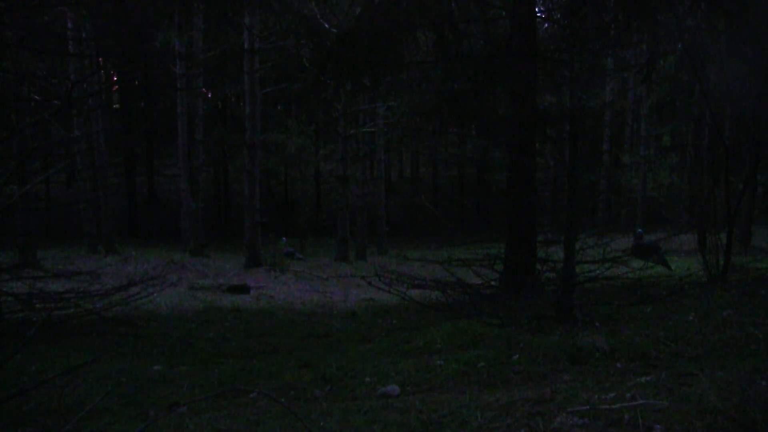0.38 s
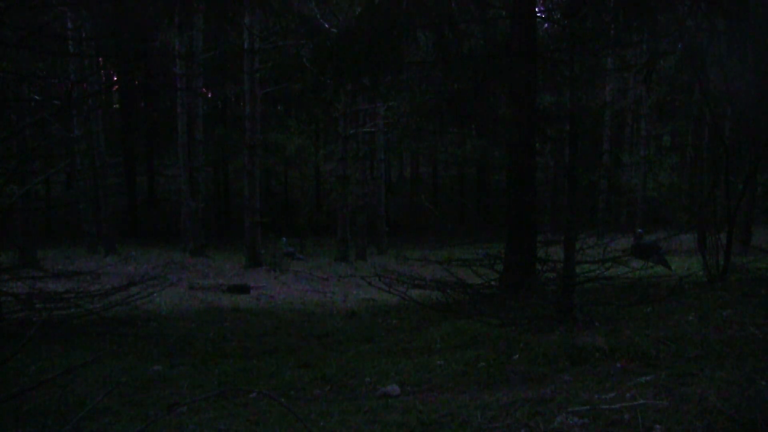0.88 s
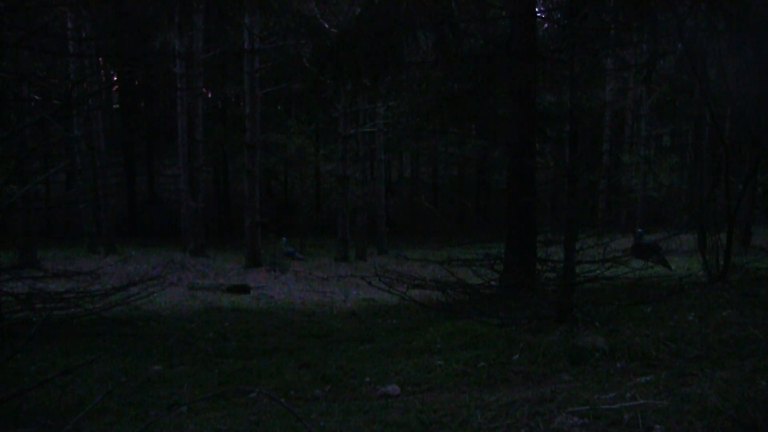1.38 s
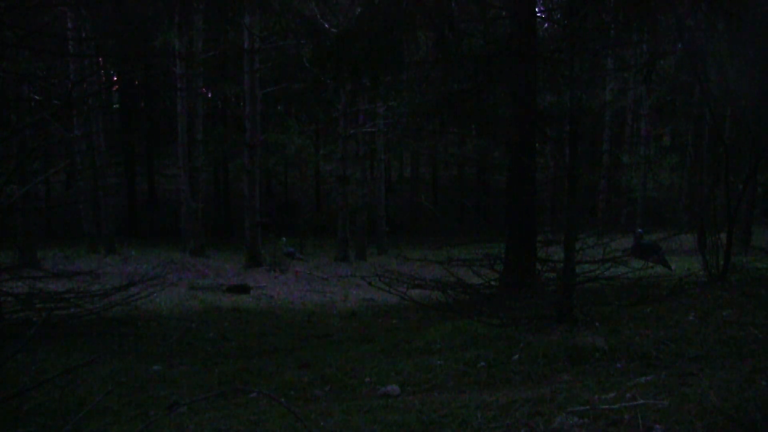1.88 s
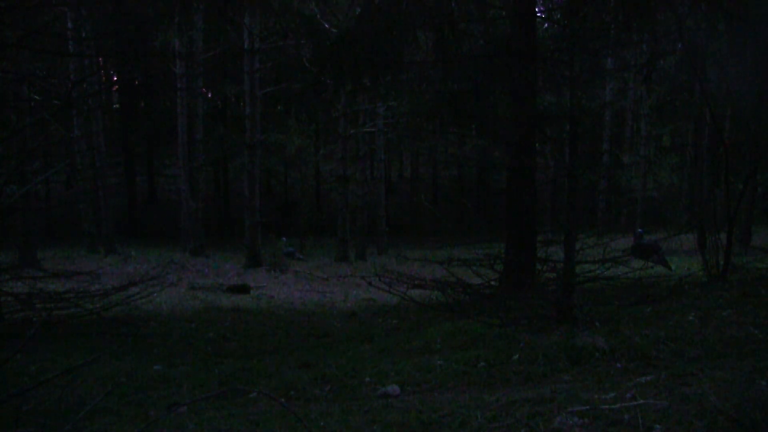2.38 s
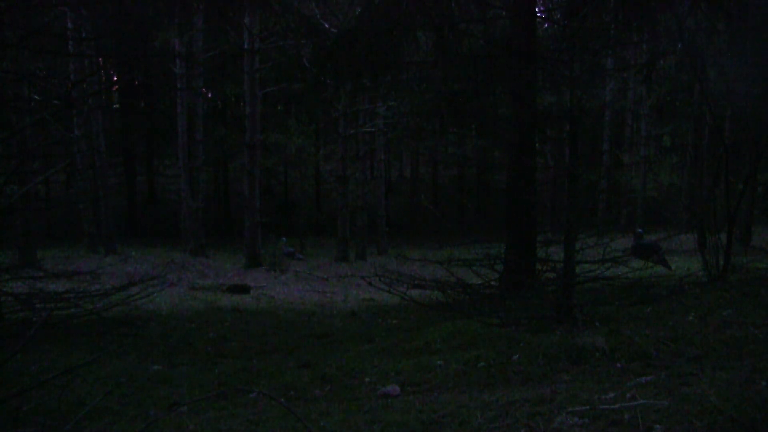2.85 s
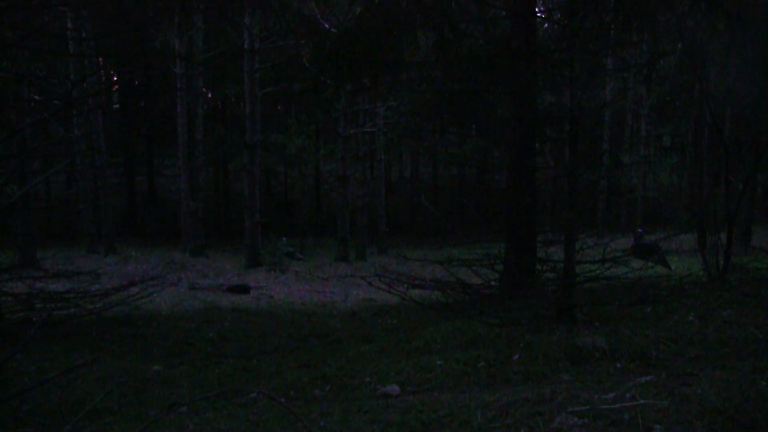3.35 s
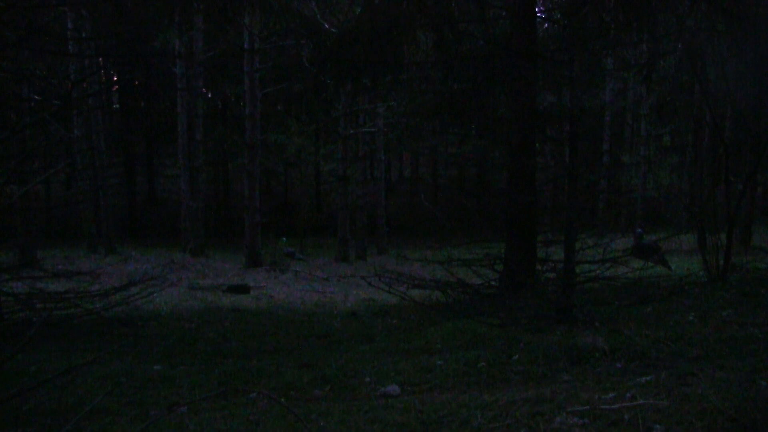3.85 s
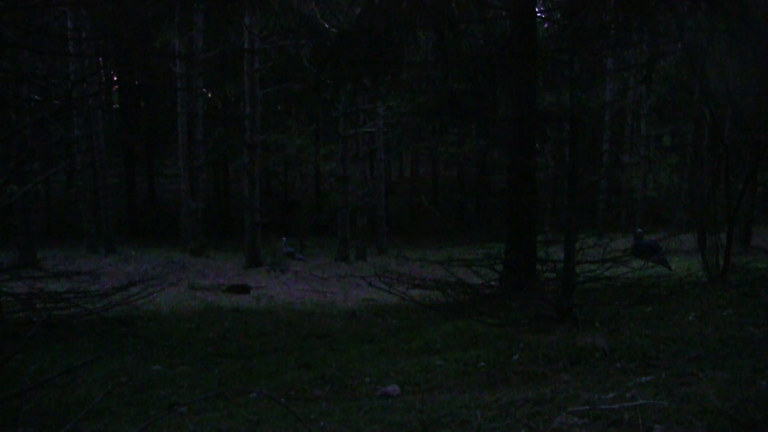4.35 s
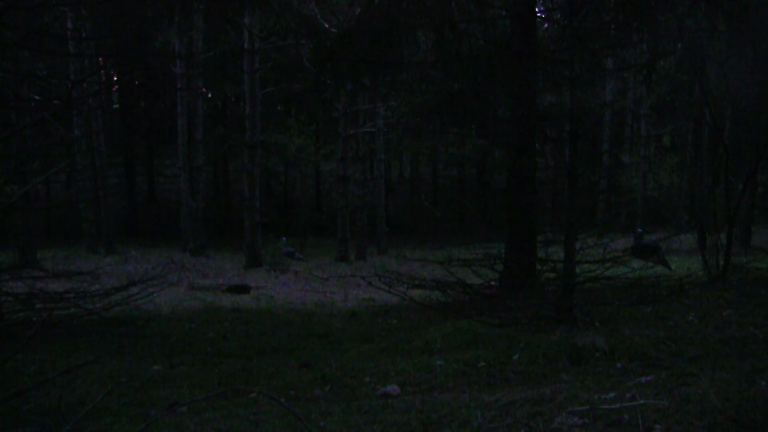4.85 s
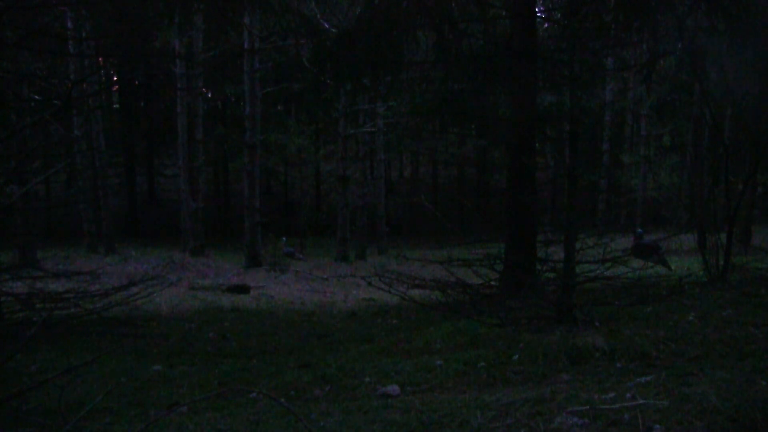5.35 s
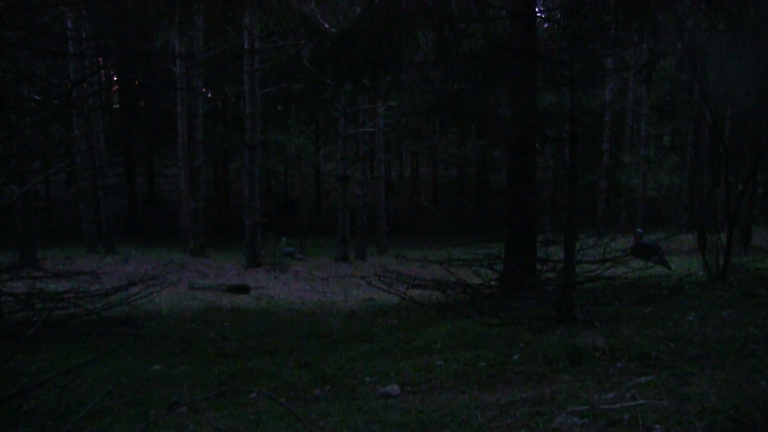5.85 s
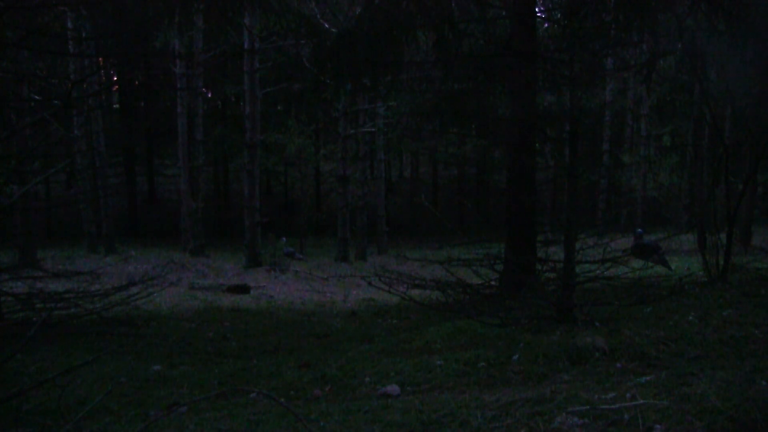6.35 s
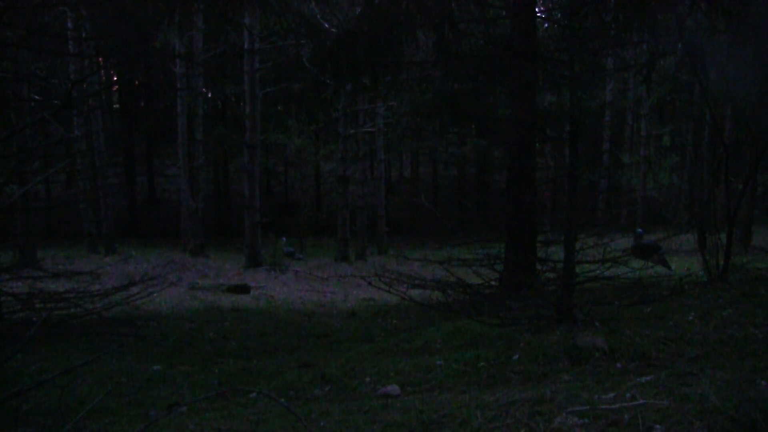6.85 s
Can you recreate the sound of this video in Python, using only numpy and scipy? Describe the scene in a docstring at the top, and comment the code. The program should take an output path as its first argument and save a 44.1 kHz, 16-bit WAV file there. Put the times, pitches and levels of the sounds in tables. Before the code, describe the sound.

Stereo forest ambience with soft hiss and low rumble. A near hen turkey on the left clucks, waits, then yelps six evenly spaced times, very short and loud, with faint tails from the trunks. High sine-like songbird notes climb behind her. After she stops the air swells suddenly; a crow-like bird caws three times, a far tom gobbles in broken bursts, a twig ticks and leaves briefly rustle.

```python
"""A turkey hen clucks and yelps close by on the left, in woods at dawn, while a small songbird whistles up a scale.
From 5.1 s the background is louder: three crow-like caws, a distant tom's gobble, a twig tick, a leaf rustle.
Hen, caw and tom are overtones of moving pitches, each weighted by a spectral curve, plus noise for breath.
Songbirds are gliding sines; background and rustle are shaped noise, the background with a low sine.
The trunks return every call as a soft decaying noise tail.
"""
import sys
import numpy as np
from scipy import signal
from scipy.fft import rfft, irfft, next_fast_len
from scipy.io import wavfile
from scipy.ndimage import uniform_filter1d, map_coordinates

SR = 44100
rng = np.random.default_rng(int(sys.argv[2]) if len(sys.argv) > 2 else 0)


def convert_level_to_amplitude(level_db):
    """Map a level in decibels to its linear amplitude factor."""
    exponent = np.asarray(level_db, float) / 20
    return 10 ** exponent


def transcribe(signal):
    """Save signal, clipped to [-1, 1], as a 16-bit WAV file at the path in sys.argv[1]."""
    frames = np.atleast_2d(signal).T
    limited = np.clip(frames, -1, 1)
    pcm = np.round(limited * 32767).astype(np.int16)
    wavfile.write(sys.argv[1], SR, pcm)


N = 318843


def unit(x):
    """Scale to rms 1."""
    return x / np.sqrt(np.mean(x ** 2) + 1e-20)


def along(points, hz):
    """Read (frequency [Hz], value) points on a log frequency axis."""
    f, v = np.transpose(points)
    return np.interp(np.log(hz + 1), np.log(f + 1), v)


def played(rows):
    """Sample indices a time table spans, and one smoothed curve per further column."""
    time_s, *columns = np.transpose(rows)
    i = np.arange(int(time_s[0] * SR), min(N, int(time_s[-1] * SR)))
    return i, [uniform_filter1d(np.interp(i / SR, time_s, c), size=90) for c in columns]


def span(start_s, length_s):
    """Sample indices of one event, cut at the end of the scene."""
    return np.arange(int(start_s * SR), min(N, int((start_s + length_s) * SR)))


def wobble(knots_per_s, count=N):
    """Smooth random curve through normal-distributed knots."""
    knots = rng.standard_normal(int(count * knots_per_s / SR) + 4)
    return map_coordinates(knots, [np.arange(count) * knots_per_s / SR])


def cycles(pitch_hz):
    """Phase [rad] of a moving pitch."""
    return 2 * np.pi * np.cumsum(pitch_hz) / SR


def filtered(x, response):
    """Multiply the spectrum of x by a response of frequency [Hz]."""
    m = next_fast_len(N + 8192)
    return irfft(rfft(x, m) * response(np.fft.rfftfreq(m, 1 / SR)), m)[..., :N]


def breath_noise(spectrum):
    """Noise of rms 1, shaped by (frequency [Hz], level [dB])."""
    return unit(filtered(rng.standard_normal(N), lambda hz: convert_level_to_amplitude(along(spectrum, hz))))


def voice(pitch_hz, spectrum, count, flicker_db, bright_db_per_octave=0):
    """Overtones of a moving pitch, each as loud as the spectrum lets it be; those above the second flicker."""
    k = np.arange(1, count + 1)[:, None]
    phase = cycles(pitch_hz)
    flicker = flicker_db * np.clip(k - 2, 0, 3) * np.array([wobble(160, count=len(phase)) for _ in k])
    level_db = along(spectrum, k * pitch_hz) + flicker + bright_db_per_octave * np.log2(k)
    overtones = np.sin(k * phase + 2 * np.pi * rng.random(k.shape))
    return np.sqrt(2) * np.sum(convert_level_to_amplitude(level_db) * overtones, axis=0)


# decay time of the trunks' tail: (frequency [Hz], t60 [s])
TRUNK_DECAY = [(500, 1.1), (1400, 2.53), (3500, 1.14), (8000, 0.54)]


def echoes(x, late_s):
    """The trunks' answer, unlike in each ear and new every third of a second; each frequency dies at its own speed."""
    out, step = np.zeros((2, N + 2 * SR)), SR // 3
    for start in range(0, N, step):
        hz, t, z = signal.stft(rng.standard_normal((2, SR)), SR, nperseg=256)
        t60_s = np.maximum(along(TRUNK_DECAY, hz), .05)[:, None]
        tail = signal.istft(z * convert_level_to_amplitude(-60 * t / t60_s), SR, nperseg=256)[1]
        age_s = np.arange(tail.shape[1]) / SR
        # the nearest trunks answer first and loudest
        tail *= np.clip(age_s / late_s, 0, 1) * (1 + 3.5 * np.exp(-age_s / 0.3) + 4 * np.exp(-age_s / 0.021))
        answer = signal.fftconvolve(x[None, start:start + step], tail / np.linalg.norm(tail[0]), axes=1)
        out[:, start:start + answer.shape[1]] += answer
    return out[:, :N]


# left-right likeness of diffuse noise: (frequency [Hz], correlation [-1 to 1])
EAR_LIKENESS = [(60, 0.92), (110, 1), (200, 0.56), (380, 0.0031), (700, 0.056), (1290, 1), (2380, 0.44),
                (4400, 0.71), (8120, 0.64), (15000, 0.48)]


def rush(spectrum):
    """Stereo noise of rms 1, partly shared by both ears through its mid/side balance."""
    def mid_side(hz):
        turn = np.arccos(np.clip(along(EAR_LIKENESS, hz), -1, 1)) / 2
        return convert_level_to_amplitude(along(spectrum, hz)) * [np.cos(turn), np.sin(turn)]

    mid, side = filtered(rng.standard_normal((2, N)), mid_side)
    return unit(np.array([mid + side, mid - side]))


# background course, relative: (time [s], level [dB])
AIR_LEVEL = [(0, -1.5), (0.452, -4.5), (1.9, -1.5), (3.05, 1.5), (3.2, -3.5), (4.4, -1), (4.7, -4),
             (5.096, -4), (5.107, 5), (5.8, 6.5), (6.8, 6.5), (7.23, 10.5)]
# air spectrum, relative: (frequency [Hz], density [dB per Hz])
HISS_SPECTRUM = [(150, -18), (250, -5.5), (458, 1), (574, 2.5), (855, -2), (1110, -4.5), (2340, -7.5),
                 (7200, -13), (14400, -21), (15700, -27)]
# rumble spectrum, relative: (frequency [Hz], density [dB per Hz])
RUMBLE_SPECTRUM = [(13, -44), (22, -7.5), (54, -18.5), (80, -4.5), (107, -1.5), (134, -1), (262, -13),
                   (350, -11), (460, -22), (770, -120)]
# far low tone: (time [s], level [dB])
DRONE_LEVEL = [(0, -60.5), (5.11, -61.5), (6.1, -50.5), (7.23, -48)]
# the rumble follows the air up to the step, then holds
STEP_S, RUMBLE_OVER_DB, RUMBLE_LATE_DB = 5.1, 3.5, 5


def background():
    """Smooth air hiss over a slowly lumping noise rumble and a wavering low sine."""
    t = np.arange(N) / SR
    tilt = convert_level_to_amplitude([[-.4], [.4]])
    air_db = np.interp(t, *np.transpose(AIR_LEVEL))
    rumble_db = uniform_filter1d(np.where(t < STEP_S, air_db + RUMBLE_OVER_DB, RUMBLE_LATE_DB), size=2000)
    air = convert_level_to_amplitude(-52 + air_db + .4 * wobble(4)) * rush(HISS_SPECTRUM) * tilt
    rumble = convert_level_to_amplitude(-54.5 + rumble_db + .7 * wobble(13.0)) * rush(RUMBLE_SPECTRUM) * tilt
    drone_db = np.interp(t, *np.transpose(DRONE_LEVEL)) + 3 * wobble(9)
    drone = convert_level_to_amplitude(drone_db) * np.sin(cycles(67 + 5 * wobble(8)))
    return air + drone + rumble


# soft treble rustle: (peak time [s], half width to 1/e [s], level [dB])
RUSTLE_SWELL = (7.12, .07, -51.5)


def rustle():
    """Leaves: one short Gaussian swell of high noise."""
    peak_s, width_s, db = RUSTLE_SWELL
    swell = np.exp(-((np.arange(N) / SR - peak_s) / width_s) ** 2)
    return convert_level_to_amplitude(db + 2.5 * wobble(40)) * swell * rush([(3000, -30), (7000, -5.5), (12000, -.5), (15700, -8)])


# twig tick: (time [s], relative level [dB])
TICKS = [(6.4667, -9)]


def twig():
    """One dry tick: three resonances that die within milliseconds."""
    out, t = np.zeros(N), np.arange(400) / SR
    for start_s, db in TICKS:
        ring = np.zeros(len(t))
        for hz, t60_s, gain in [(9000, 0.0011, 1), (5500, 0.003, 0.23), (3200, 0.0037, 0.17)]:
            ring += gain * np.sin(2 * np.pi * hz * t) * convert_level_to_amplitude(-60 * t / t60_s)
        out[round(start_s * SR):][:len(t)] += convert_level_to_amplitude(db + 5.5) * ring * (1 - np.exp(-t / .0001))
    return out


# songbird notes: (time [s], length [s], pitch [Hz], level [dB], opening swoop [Hz])
SONG_NOTES = [(0.032, 0.33, 3990, -68, 148.5), (0.613, 0.16, 6680, -64, 96), (0.975, 0.22, 6810, -63, 293),
              (1.364, 0.32, 6940, -60.5, 519), (1.742, 0.26, 7000, -53, 715),
              (2.102, 0.29, 7245, -50.5, 1009), (2.439, 0.3, 7436, -46, 902),
              (2.704, .2, 7620, -50.5, 394.5), (2.927, 0.29, 7780, -55.5, -100),
              (3.26, 0.25, 8030, -61.5, 105), (3.456, 0.33, 8530, -59.5, -100),
              (3.628, .09, 7800, -56.5, 197.5), (3.781, 0.2, 7020, -62.5, -200),
              (3.941, 0.16, 7050, -60, -150), (4.088, 0.12, 6940, -56.5, -200),
              (5.13, 0.29, 6840, -53.5, 403), (5.898, 0.16, 6800, -55, 54), (6.33, .17, 6840, -52.5, -60),
              (6.626, 0.25, 6930, -54.5, 402), (7.021, 0.23, 6880, -49, 294)]
# far, faint whistle: (start [s], end [s], pitch [Hz], level [dB])
FAR_WHISTLE = (1, 3, 3519.5, -71.5)


def songbirds():
    """Thin sine whistles that swoop onto their pitch and flicker among the leaves."""
    out = np.zeros(N)
    for start_s, length_s, hz, db, swoop_hz in SONG_NOTES:
        i = span(start_s, length_s)
        t = i / SR - start_s
        pitch_hz = hz + swoop_hz * np.exp(-t / 0.016) + 22 * wobble(120, count=len(i))
        shape = np.clip(np.minimum(t / 0.03, (length_s - t) / 0.08), 0, 1)
        out[i] += convert_level_to_amplitude(db + 2.0 * wobble(58.86, count=len(i))) * shape * np.sin(cycles(pitch_hz))
    start_s, end_s, hz, db = FAR_WHISTLE
    i = np.arange(int(start_s * SR), int(end_s * SR))
    far_hz = hz + 30 * wobble(60, count=len(i))
    out[i] += convert_level_to_amplitude(db + 4.3 * wobble(34.75, count=len(i))) * np.sin(cycles(far_hz))
    return out


# gobble syllables: (time [s], relative level [dB], pitch [Hz], length [s])
GOBBLE_SYLLABLES = [(6.089, -32, 564, 0.036), (6.37, -30, 665, 0.046), (6.45, -32, 1035, 0.037),
                    (6.48, -35, 1040, .06), (6.531, -27.5, 1057, 0.011), (6.567, -30.5, 610, .036),
                    (6.576, -32.5, 1086, .031), (6.627, -32, 980, 0.023), (6.672, -29.5, 930, 0.017),
                    (6.95, -35, 580, .035), (7.011, -30, 953, .019), (7.041, -38.5, 1004, 0.029),
                    (7.09, -38, 987, 0.016), (7.128, -40, 1033, .019), (7.163, -34.5, 563, .033),
                    (7.18, -38, 975, 0.026)]
# tom's throat: (frequency [Hz], level [dB])
TOM_THROAT = [(400, -30), (600, -19), (780, -24), (1000, 0), (1150, -5), (1280, -16), (1700, 0), (1950, 2),
              (2200, -13), (2800, -26), (3200, -22), (3700, -27), (6000, -50)]
# higher syllables are purer: (pitch [Hz], overtone slope [dB per octave])
PURITY = [(700, -.5), (900, -28)]
# murmur under the gobble: (time [s], pitch [Hz], noise level [dB])
MURMUR_COURSE = [(6.08, 606.4, -44.5), (6.16, 610.6, -38.5), (6.4, 610, -35), (6.6, 589.6, -47),
                 (6.75, 570.2, -37.5), (6.95, 568, -37.5), (7.23, 580.6, -54)]
SYLLABLE_RISE_SHARE, MURMUR_TONE_DB = .03, -49


def tom():
    """Short syllables of flickering overtones over a low, hoarse, unsteady murmur."""
    out = np.zeros(N)
    for start_s, db, hz, length_s in GOBBLE_SYLLABLES:
        i = span(start_s, length_s)
        u = (i / SR - start_s) / length_s
        pitch_hz = hz * (1 + SYLLABLE_RISE_SHARE * u + 0.018 * wobble(180, count=len(i)))
        shape = np.sqrt(np.abs(np.sin(np.pi * u)))
        syllable = voice(pitch_hz, TOM_THROAT, count=6, flicker_db=2.5, bright_db_per_octave=along(PURITY, hz))
        out[i] += convert_level_to_amplitude(db) * shape * syllable
    i, (pitch_hz, noise_db) = played(MURMUR_COURSE)
    pitch_hz = pitch_hz * (1 + 0.0402 * wobble(60, count=len(i)))
    out[i] += convert_level_to_amplitude(MURMUR_TONE_DB + 3.9 * wobble(50.0, count=len(i))) * np.sin(cycles(pitch_hz))
    out[i] += convert_level_to_amplitude(noise_db + 3.8 * wobble(20.9, count=len(i))) * breath_noise(TOM_THROAT)[i]
    return out


# shared opening of a caw: (time after start [s], share of top pitch [0-1], level [dB], rattle [0-1])
CAW_OPENING = [(0, .74, -30, .2), (.02, .89, -4, .3), (.057, 1, 0, .42), (.105, .94, -1.5, .52),
               (.15, .825, -2.5, .7)]
TIRE_DB_PER_S, CLOSE_S, CLOSE_DB = 17, 0.0298, 20


def caw_rows(start_s, length_s, top_hz, last_hz, db):
    """The shared opening, then a slide to the last pitch as the bird tires, and a quick close."""
    rows = [(start_s + t, top_hz * share, db + rel_db, rattle) for t, share, rel_db, rattle in CAW_OPENING]
    opened_s, _, held_db, rattle = rows[-1]
    end_s = start_s + length_s
    close_s = end_s - CLOSE_S
    tired_db = held_db - TIRE_DB_PER_S * (close_s - opened_s)
    return rows + [(close_s, last_hz, tired_db, rattle), (end_s, last_hz, tired_db - CLOSE_DB, rattle)]


# caws: (time [s], length [s], top pitch [Hz], last pitch [Hz], relative level [dB])
CAW_CALLS = [(5.395, .515, 590, 432, -24), (6.135, .29, 600, 468, -24), (6.725, .305, 615, 436, -24)]
# throat of the caw: (frequency [Hz], level [dB])
CROW_THROAT = [(300, -48), (450, -15.5), (750, -25), (1000, -9), (1200, -2.5), (1400, 1.5), (1750, -2.5),
               (1950, -31.5), (2200, -14.5), (2700, -29), (3300, -18.5), (4000, -29), (4900, -20.5),
               (5600, -20), (6600, -26.5), (9000, -67), (14000, -73)]
# air in the caw, relative: (frequency [Hz], level [dB])
CROW_BREATH = [(700, -26), (1000, -2), (1500, 7), (2000, -1), (2700, -9), (3300, -4), (4400, -9),
               (5200, -9), (5650, 2), (6100, -8), (8500, -16), (14000, -40)]


def crow():
    """A membrane rattling some fifty times a second drags pitch and strength in a saw; breath noise rides on it."""
    tone, blow = np.zeros(N), np.zeros(N)
    for call in CAW_CALLS:
        i, (pitch_hz, db, rattle) = played(caw_rows(*call))
        turn = np.cumsum(52 * (1 + 0.095 * wobble(32.2, count=len(i)))) / SR % 1
        saw = uniform_filter1d(.5 - turn, size=120)
        beat = 1 - np.clip(rattle, 0, 1) * (1 + np.cos(2 * np.pi * turn)) / 2
        shaky = 1 + .17 * rattle * saw + .02 * wobble(180, count=len(i))
        unsteady_db = 2.1 * wobble(120, count=len(i))
        call_voice = voice(pitch_hz * shaky, CROW_THROAT, count=14, flicker_db=-0.26)
        tone[i] += convert_level_to_amplitude(db + unsteady_db) * beat * call_voice
        blow[i] += convert_level_to_amplitude(db) * np.sqrt(beat)
    return tone + convert_level_to_amplitude(-8) * blow * breath_noise(CROW_BREATH)


# fall of every call: (share of the fall [0-1], pitch over the lowest [ratio])
YELP_FALL = [(0, 1.41), (.16, 1.43), (.45, 1.35), (.66, 1.21), (.84, 1.06), (1, 1)]
# climb of every call: (share of the climb [0-1], pitch over the lowest [ratio])
YELP_CLIMB = [(0, 1.02), (.5, 1.13), (.78, 1.28), (1, 1.3)]
# effort at the points of the fall: (level [dB])
FALL_EFFORT = [-31, -5, .5, 3, -.5, 0.05]
# effort at the points of the climb: (level [dB])
CLIMB_EFFORT = [-.5, -1.5, 0, -28.5]
FULL_FALL_S = .03  # a shorter fall starts lower


def yelp_rows(start_s, low_hz, db, fall_s, hold_s, climb_s):
    """The shared fall, low hold and climb, stretched to one call."""
    depth = min(1, fall_s / FULL_FALL_S)
    climb_start_s = start_s + fall_s + hold_s
    fall = [(start_s + fall_s * u, low_hz * ratio ** depth, db + effort_db)
            for (u, ratio), effort_db in zip(YELP_FALL, FALL_EFFORT)]
    climb = [(climb_start_s + climb_s * u, low_hz * ratio, db + effort_db)
             for (u, ratio), effort_db in zip(YELP_CLIMB, CLIMB_EFFORT)]
    return fall + climb


# hen calls: (time [s], lowest pitch [Hz], effort [dB], fall [s], hold [s], climb [s])
HEN_CALLS = [(.321, 659.2, 1, 0.0095, 0.0033, 0.018), (2.628, 538, -24, 0.0046, .002, 0.0095),
             (2.77, 606, -1.5, .045, .009, .029), (3.108, 606.7, -1, .047, 0.0058, 0.043),
             (3.482, 645, 0, .048, .004, .036), (3.861, 658, 0, .038, .029, .019),
             (4.215, 670, 2, 0.036, .012, 0.034), (4.583, 628.7, 1, 0.044, .013, 0.028)]
# hen's voice as heard close by, with a notch where the ground's reflection cancels it:
# (frequency [Hz], level [dB])
HEN_NEAR_VOICE = [(600, -38), (780, -30), (900, -23), (1200, -7), (1320, -4), (1440, -25), (1590, -12),
                  (1850, -31), (2100, -45), (2280, -34), (2700, -37), (3050, -43), (3550, -35), (4200, -48),
                  (5200, -60)]
# hen's breath, relative: (frequency [Hz], level [dB])
HEN_BREATH = [(700, -19.5), (1100, 0), (1500, -4), (2600, 3), (3600, -0.5), (4600, -9), (5500, -22),
              (6500, -11), (7500, -22.5), (10000, -13), (15500, -39)]
PUFF_DB, PUFF_DB_PER_EFFORT_DB = -43.5, 1.5


def hen():
    """Overtones on a U-shaped pitch, the second dipping across the ground's notch, and air puffed once a cycle."""
    tone, puffs = np.zeros(N), np.zeros(N)
    for call in HEN_CALLS:
        i, (pitch_hz, effort_db) = played(yelp_rows(*call))
        shaky = 1 + .006 * wobble(250, count=len(i))
        puff_db = PUFF_DB + PUFF_DB_PER_EFFORT_DB * effort_db + 2.5 * wobble(90, count=len(i))
        # less effort also dulls the overtones
        call_voice = voice(pitch_hz * shaky, HEN_NEAR_VOICE, count=7, flicker_db=1.6,
                           bright_db_per_octave=.25 * effort_db)
        tone[i] += convert_level_to_amplitude(.85 * effort_db - 3) * call_voice
        puffs[i] += convert_level_to_amplitude(puff_db) * (1 + np.cos(cycles(pitch_hz)))
    return tone + puffs * breath_noise(HEN_BREATH)


# hen's side: (frequency [Hz], left minus right [dB])
HEN_SIDE = [(300, 1), (700, 3), (1300, 8), (1650, 10), (5000, 7), (15000, 0)]
# hen's phase: (frequency [Hz], lead of left over right [rad])
HEN_PHASE = [(0, -0.5), (3530, 0.9), (4820, 3.5), (6720, -1.5), (7840, 0.5), (16000, -0.1)]


def placed_hen(near):
    """Level and phase differences between the ears put the hen on the left."""
    ear = np.array([[.5], [-.5]])
    return filtered(near, lambda hz: convert_level_to_amplitude(ear * along(HEN_SIDE, hz)) * np.exp(1j * ear * along(HEN_PHASE, hz)))


# what of the hen's voice reaches the trunks, the ground's notch refilled: (frequency [Hz], level [dB])
HEN_CARRY = [(700, -9), (1250, 2), (1450, 13), (1700, 4), (2500, 3.5), (3200, 5), (3650, 15.5), (4300, 2)]


def scene():
    """The hen stands near and left; the other birds are ahead and wetter."""
    near, caw, gobble, song = hen(), crow(), tom(), songbirds()
    carried = filtered(near, lambda hz: convert_level_to_amplitude(along(HEN_CARRY, hz)))
    mix = background() + rustle() + twig()
    mix += song + convert_level_to_amplitude(1.5) * echoes(song, late_s=0.014)
    mix += gobble * convert_level_to_amplitude([[.8], [-.8]]) + convert_level_to_amplitude(-11) * echoes(gobble, late_s=0.041)
    mix += caw * convert_level_to_amplitude([[.3], [-.3]]) + convert_level_to_amplitude(-5.5) * echoes(caw, late_s=0.022)
    return mix + placed_hen(near) + convert_level_to_amplitude(-33) * echoes(carried, late_s=0.012)


def low_pass(x):
    """Removes everything above the highest recorded frequency."""
    return signal.sosfilt(signal.butter(12, 16470, fs=SR, output="sos"), x)


def record(dry):
    """The converter's ceiling, at full scale, rounds off the loudest peaks."""
    limited = dry / (1 + np.abs(dry) ** 16) ** (1 / 16)
    return low_pass(limited)


dry = scene()
out = record(dry)
transcribe(out)
```